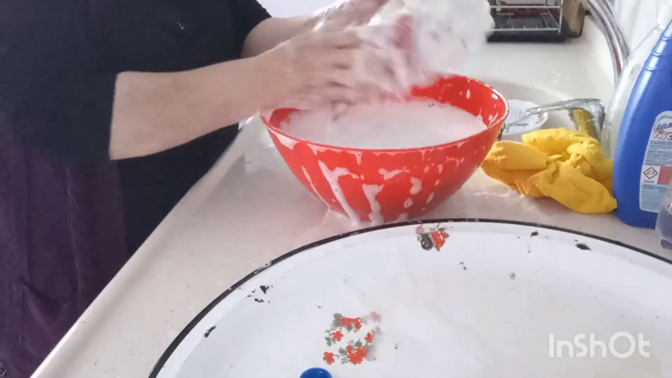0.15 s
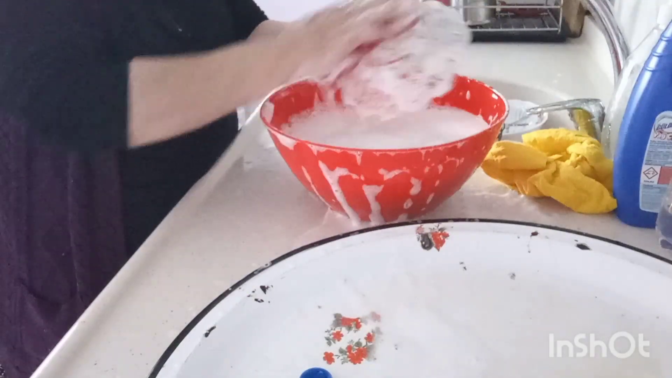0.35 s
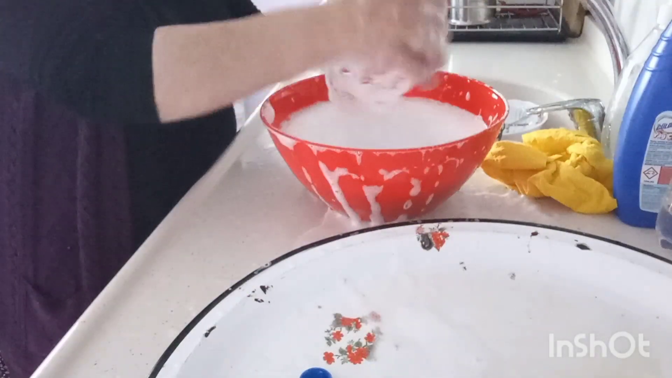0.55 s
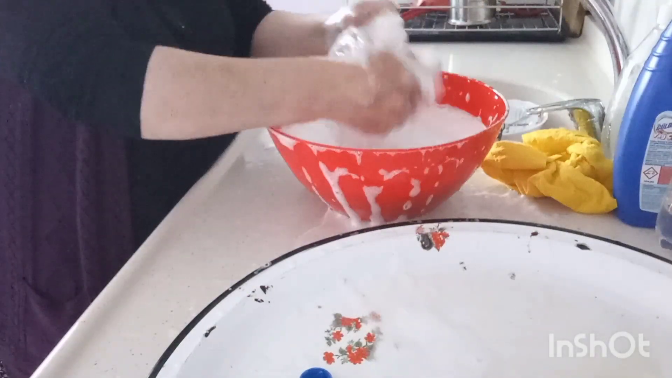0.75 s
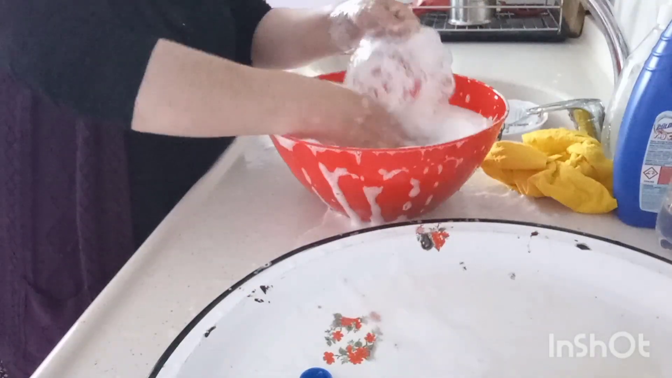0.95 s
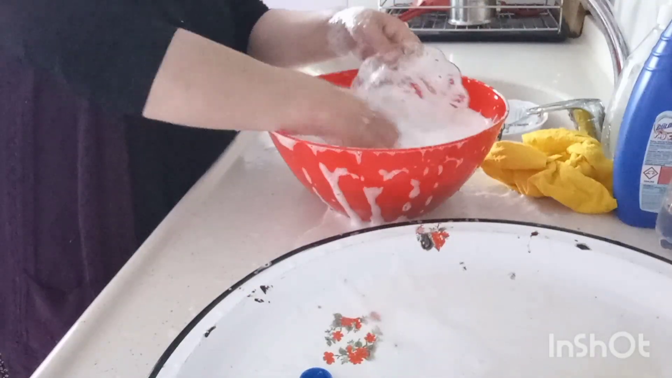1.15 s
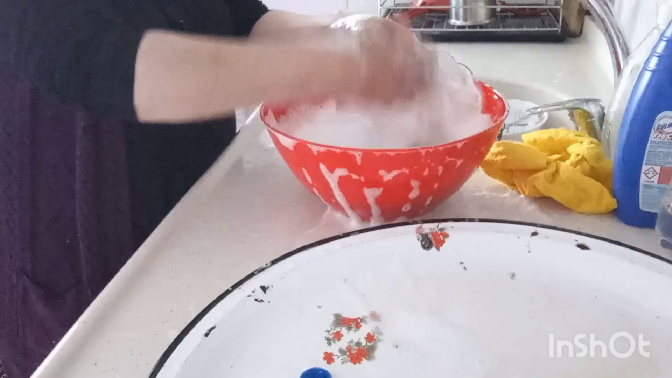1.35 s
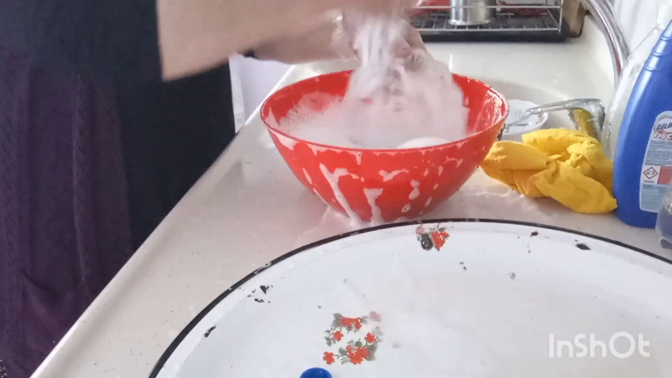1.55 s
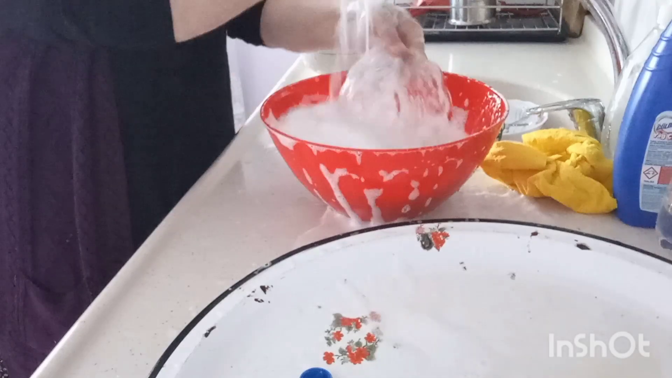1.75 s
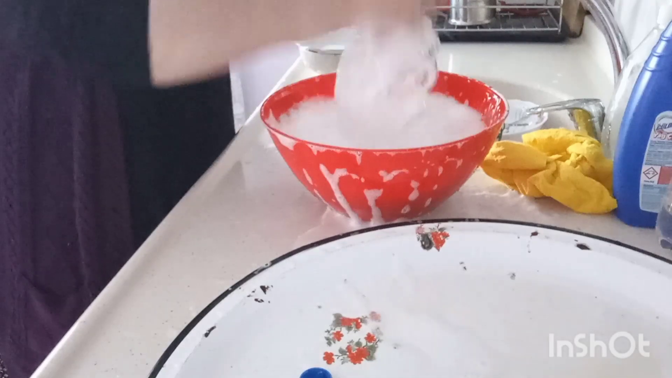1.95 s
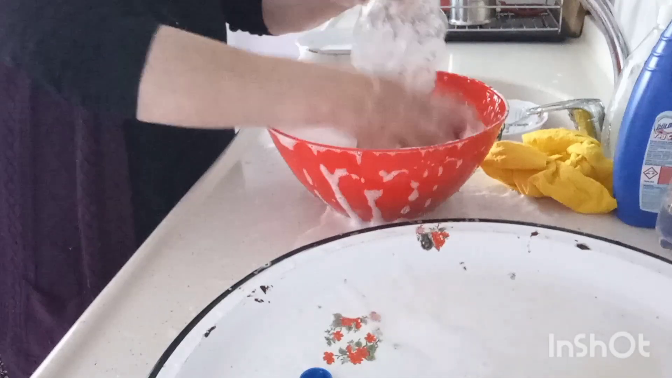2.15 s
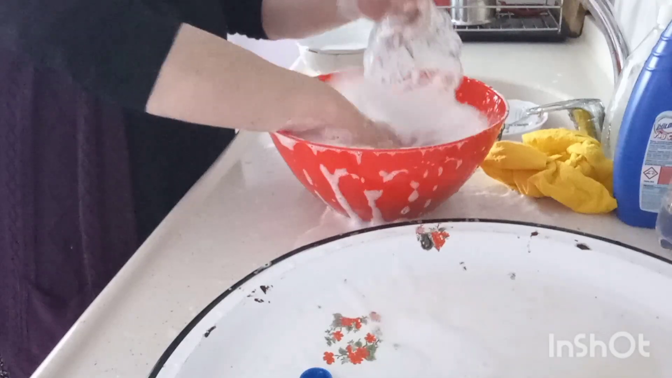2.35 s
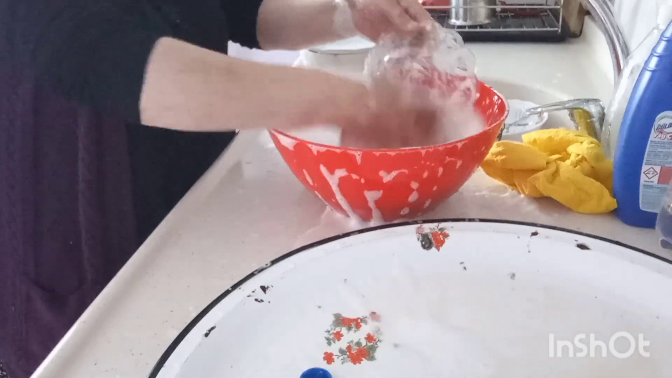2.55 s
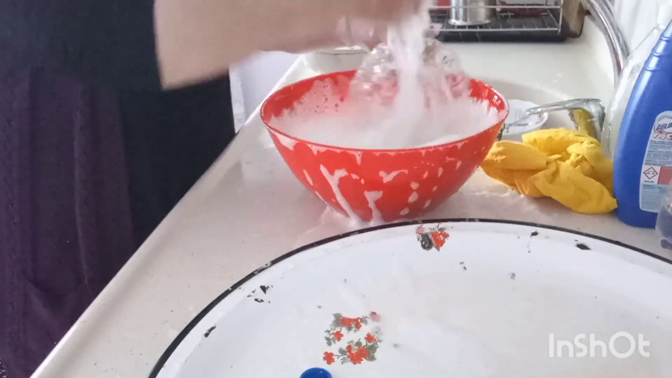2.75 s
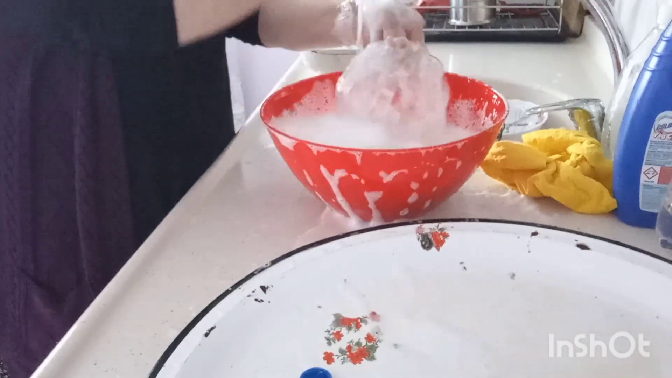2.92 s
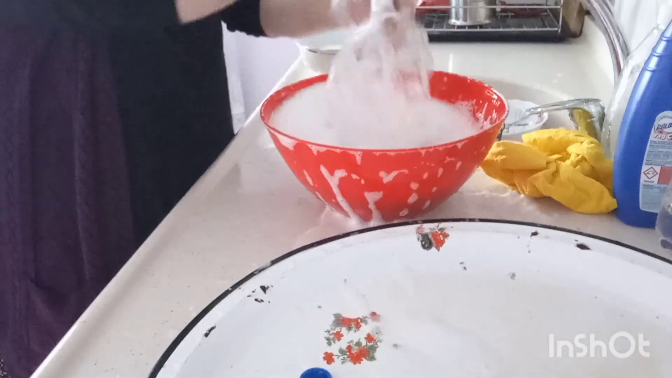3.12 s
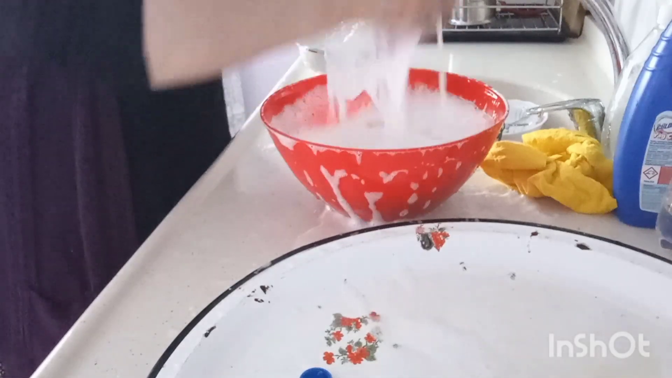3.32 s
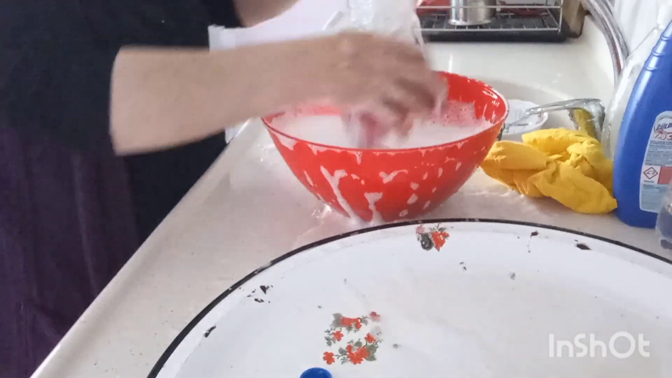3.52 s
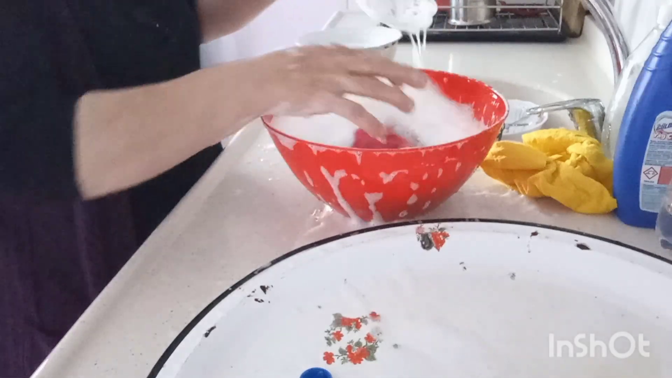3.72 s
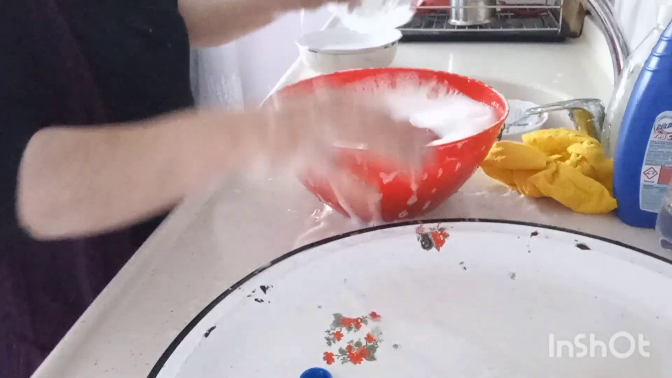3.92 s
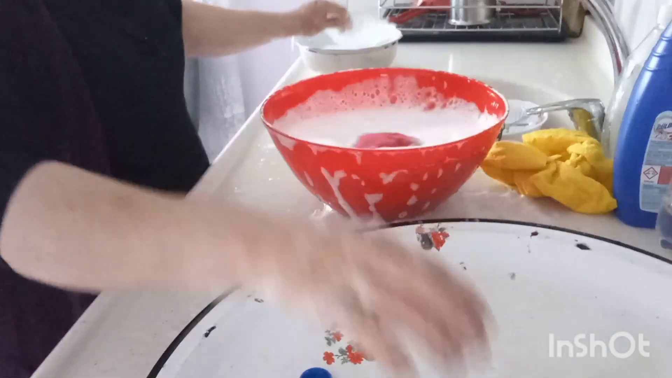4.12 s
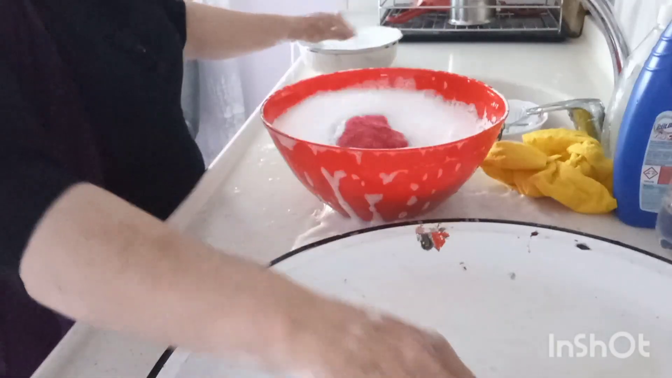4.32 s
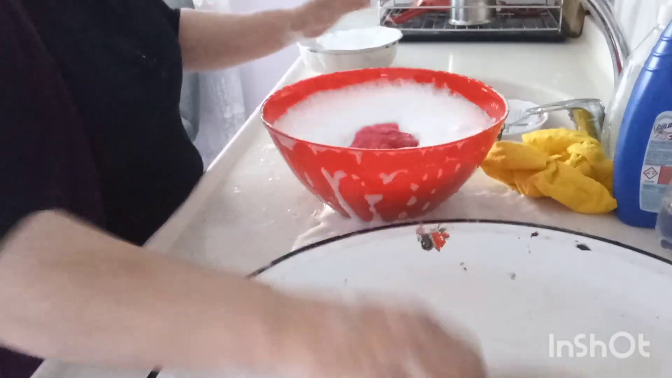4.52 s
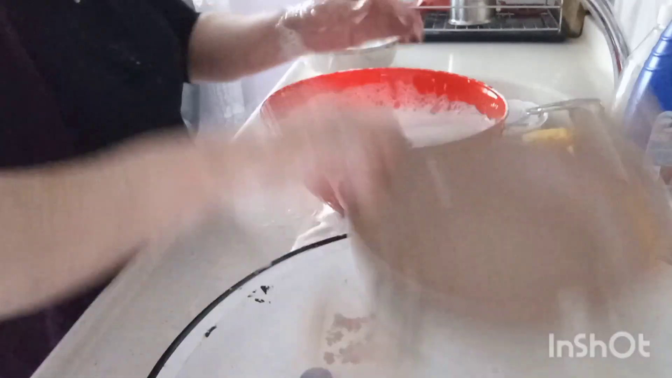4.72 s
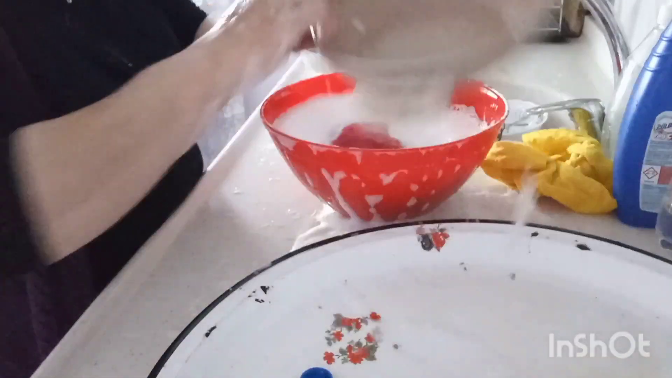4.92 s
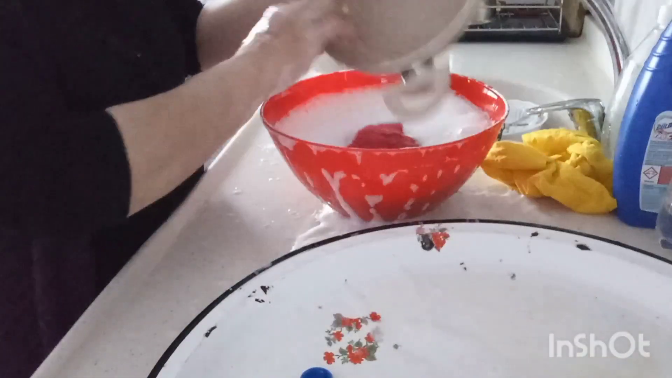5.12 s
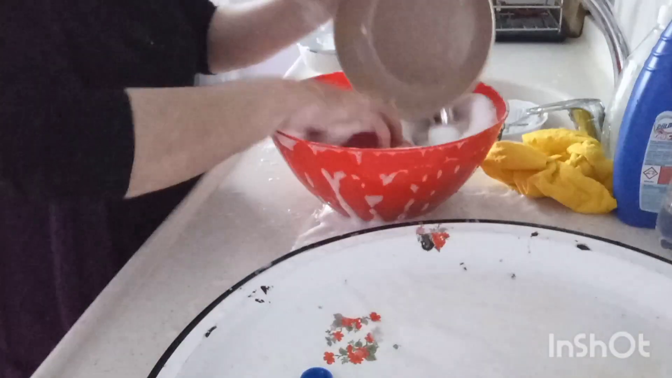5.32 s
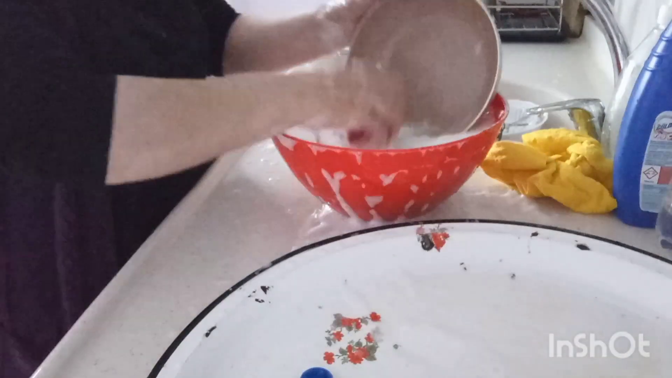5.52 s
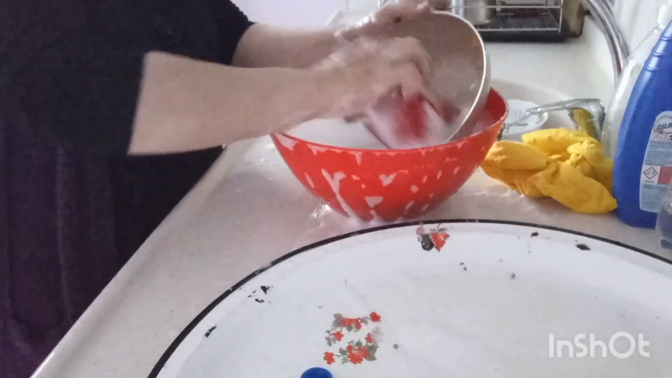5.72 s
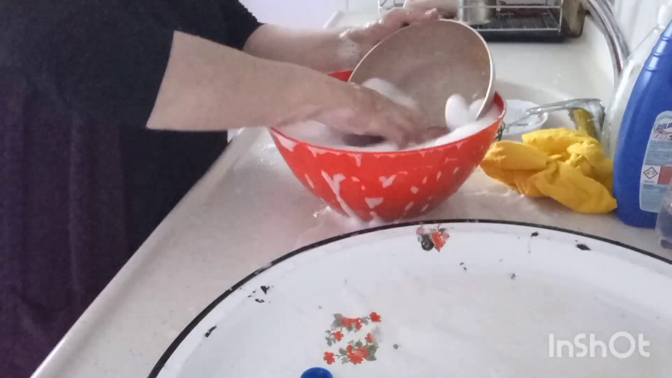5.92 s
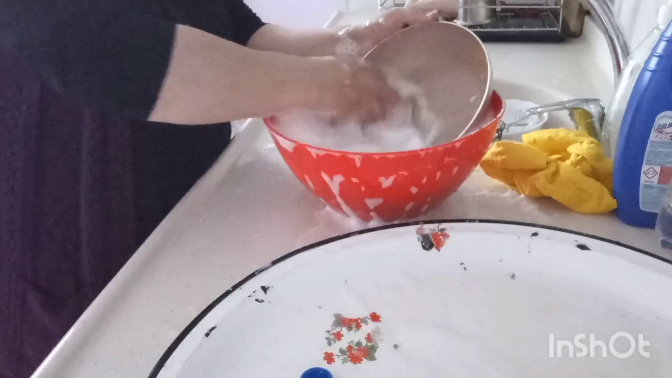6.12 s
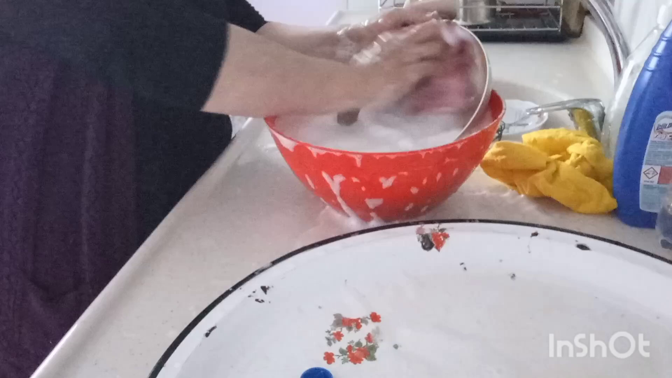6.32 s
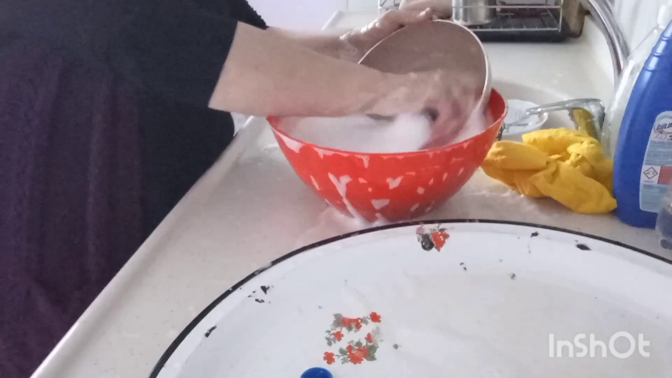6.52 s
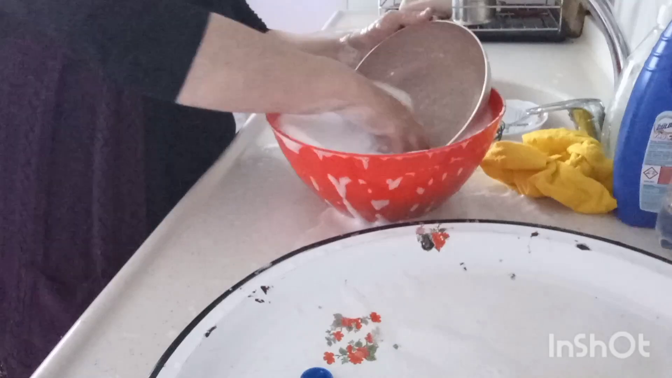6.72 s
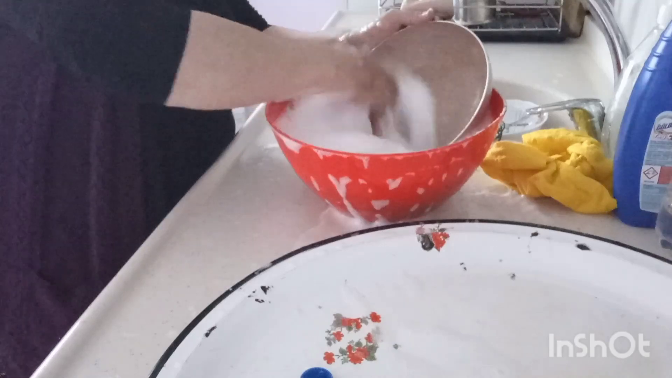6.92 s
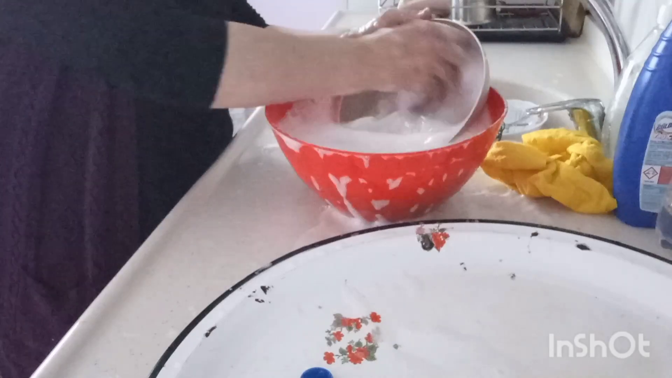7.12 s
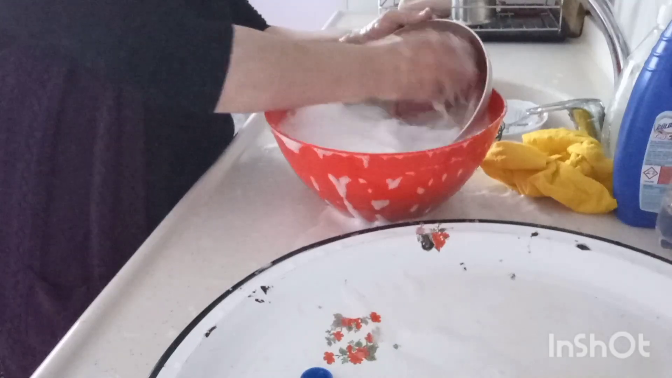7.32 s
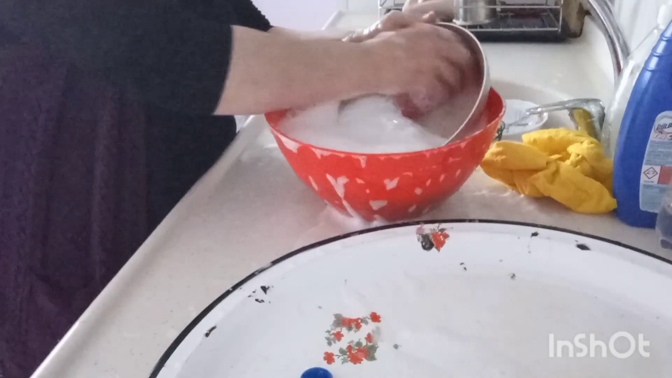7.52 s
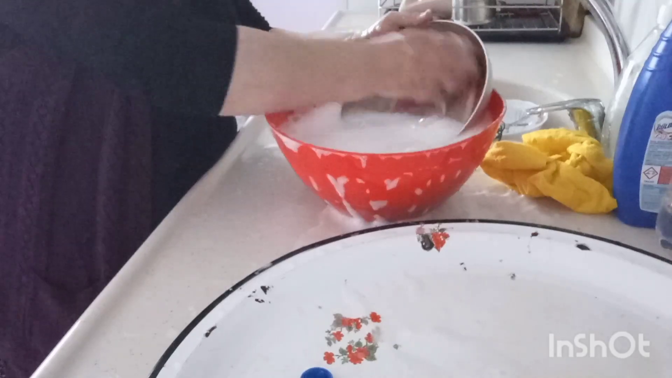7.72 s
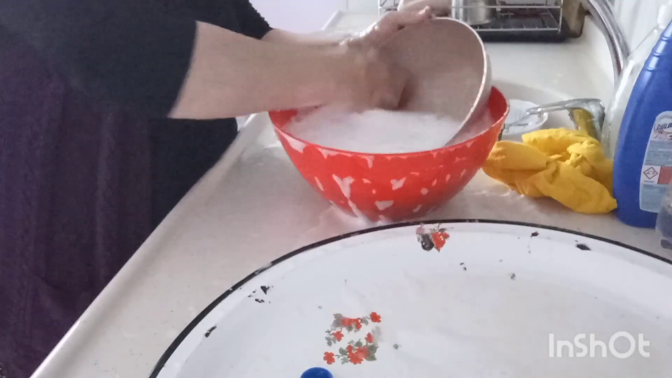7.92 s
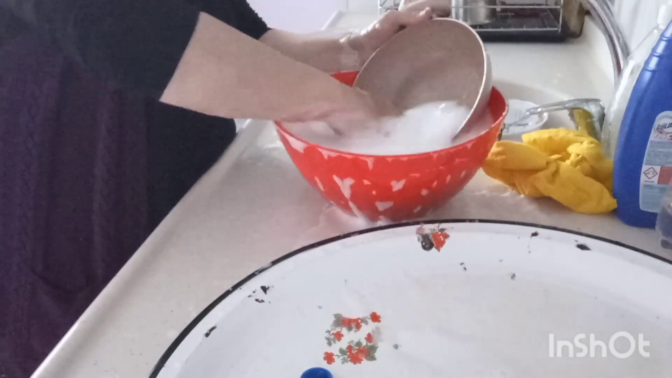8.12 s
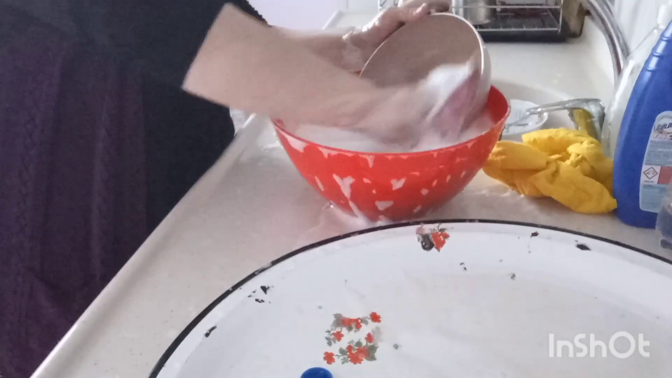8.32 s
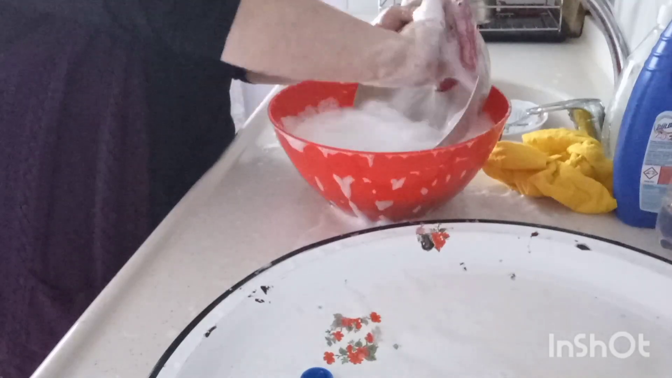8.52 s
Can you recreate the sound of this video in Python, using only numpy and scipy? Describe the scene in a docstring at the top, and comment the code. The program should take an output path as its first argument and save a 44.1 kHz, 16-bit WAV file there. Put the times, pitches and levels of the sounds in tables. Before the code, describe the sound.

Quiet sloshing, squelching and dripping of soapy water, then loud ringing pan clatter, a hollow watery thump, and gentle hollow scrubbing in a kitchen.

```python
"""Washing up by hand

A glass is sponged, dipped and drained in a plastic bowl of suds on a kitchen counter; then a pan
clatters on an enamel basin, bumps down into the bowl and is scrubbed. Water and foam are clouds
of damped sines, dishes are decaying modes, slaps and ticks are shaped noise, and scrubbing is
random impulses through the pan's resonances. A small hard room answers."""
import sys
import numpy as np
from scipy import signal
from scipy.fft import rfft, irfft, next_fast_len
from scipy.io import wavfile
from scipy.ndimage import uniform_filter1d

SR = 44100
rng = np.random.default_rng(int(sys.argv[2]) if len(sys.argv) > 2 else 0)


def file_out(sig):
    """Save sig as 16-bit WAV at sys.argv[1]."""
    # one column per channel
    cols = np.atleast_2d(sig).T
    # limit, then scale
    lim = np.clip(cols, -1, 1)
    pcm = np.round(lim * 32767).astype(np.int16)
    wavfile.write(sys.argv[1], SR, pcm)


N = 377496

# spectrum of water bubbles: (frequency [Hz], level [dB])
WATER = [(150, -33), (260, -20.5), (325, 8.5), (415, -3.5), (480, 6), (570, 2), (1000, 1.5), (1800, 5),
         (3000, 1), (7000, -21)]
# spectrum of bursting foam: (frequency [Hz], level [dB])
FOAM = [(500, 6.5), (1500, 1.5), (2500, -1.5), (4000, -1), (6300, 5.5), (7800, -16), (15000, 2)]
AIR_ATTACK_S = 0.0016  # onset of a single air pocket


def amp(db):
    """dB to amplitude."""
    return 10 ** (np.asarray(db) / 20)


def unit(x):
    """x at rms 1."""
    return x / np.sqrt(np.mean(x ** 2) + 1e-20)


def peak(x):
    """x at peak 1."""
    return x / (np.abs(x).max() + 1e-20)


def along(points, hz):
    """Interpolate (Hz, value) points on a log frequency axis."""
    f, v = np.transpose(points)
    return np.interp(np.log(hz + 1), np.log(f + 1), v)


def ring_time():
    """Half a second of time [s] for one event."""
    return np.arange(SR // 2) / SR


def splash_time():
    """A fifth of a second of time [s] for one splash."""
    return np.arange(SR // 5) / SR


def fade(t, t60):
    """Exponential decay, 60 dB in t60 seconds."""
    return amp(-60 * t / np.maximum(t60, 1e-3))


def burst(t, t60, attack):
    """A soft start, then an exponential decay."""
    return fade(t, t60) * (1 - np.exp(-t / attack))


def stroke(rise, t60):
    """The envelope of one hand movement: it swells for rise seconds, then dies away."""
    t = np.arange(int((rise + t60 * 2 / 3) * SR) + 1024) / SR
    swell = np.sin(np.pi / 2 * np.minimum(t / max(rise, 1e-3), 1))
    return swell * fade(np.maximum(t - rise, 0), t60)


def add(out, s, x):
    """Mix x into out at time s."""
    part = out[max(round(s * SR), 0):][:len(x)]
    part += x[:len(part)]


def filtered(x, gain):
    """x times a gain that depends on frequency."""
    m = next_fast_len(len(x) + 4096)
    return irfft(rfft(x, m) * gain(np.fft.rfftfreq(m, 1 / SR)), m)[:len(x)]


def coloured(x, points):
    """x through a (Hz, dB) spectrum, at rms 1."""
    return unit(filtered(x, lambda hz: amp(along(points, hz))))


def noise(points, size):
    """White noise through a (Hz, dB) spectrum, at rms 1."""
    return coloured(rng.standard_normal(size), points)


def dying(t60s):
    """Half a second of noise in which each frequency dies at its own speed."""
    hz, t, z = signal.stft(rng.standard_normal(SR // 2), SR, nperseg=256)
    return signal.istft(z * fade(t, along(t60s, hz)[:, None]), SR, nperseg=256)[1][:SR // 2]


def ring(modes, scatter_db, wander):
    """One blow on a set of decaying modes, each at a new strength and with a wandering phase."""
    t = ring_time()
    knots = np.linspace(0, t[-1], num=50)
    out = np.zeros(len(t))
    for hz, db, t60 in modes:
        phase = np.interp(t, knots, np.cumsum(wander * rng.standard_normal(len(knots))))
        tone = np.sin(2 * np.pi * hz * t + phase - phase[0])
        out += amp(db + scatter_db * rng.normal()) * fade(t, t60) * tone
    return out


def bubbles(pitch, rate, spread, cycles, size_db, rise):
    """A cloud of damped sines, gliding up by the share rise, scattered round a pitch curve; rms 1."""
    size = len(pitch)
    u = rng.random((int(rate * size / SR) + 1, 4))
    start = (u[:, 0] * size).astype(int)
    scatter = np.exp(spread * (u[:, 1] + u[:, 2] - 1))
    hz = np.clip(pitch[start] * scatter, 150, 15000)[:, None]
    loud = amp(size_db * np.minimum(-np.log(u[:, 3]), 3.5))[:, None]
    k = np.arange(int(min(SR * cycles / np.percentile(hz, 10), 1500)))
    age = hz * k / SR / cycles
    turns = cycles * age * (1 + rise * np.minimum(age, 1) / 2)
    wave = loud * fade(age, 0.54) * (1 - np.exp(-20 * age)) * np.sin(2 * np.pi * turns)
    return unit(np.bincount((start[:, None] + k).ravel(), wave.ravel(), size)[:size])


def cavities(x, depth_db):
    """Shifting hollows between hand, dish and water favour some pitches for a moment."""
    z = signal.stft(x, nperseg=512, noverlap=384)[2]
    field = uniform_filter1d(rng.standard_normal(z.shape), size=4, axis=0)  # over frequency
    field = uniform_filter1d(field, size=24, axis=1)  # over time
    z = z * amp(depth_db * np.tanh(unit(field)))
    return unit(signal.istft(z, nperseg=512, noverlap=384)[1][:len(x)])


def background():
    """Still air as shaped noise, with a faint appliance hum and whine as steady sines."""
    # still room: (frequency [Hz], level [dB])
    room_floor = [(15, -58), (25, -23), (69, -12), (101, -7.5), (260, -23), (331, -21), (1020, -29),
                  (1340, -33), (1570, -31), (2120, -34), (5730, -35), (8810, -47), (15500, -38)]
    # appliance hum and whine: (frequency [Hz], rms level [dB])
    hum_lines = [(96.9, -82.5), (333.8, -83.5), (10153, -92)]
    t = np.arange(N) / SR
    hum = sum(amp(db) * np.sqrt(2) * np.sin(2 * np.pi * hz * t) for hz, db in hum_lines)
    return amp(-70.5) * noise(room_floor, size=N) + hum


def kitchen(x, early_db, wet_db):
    """Counter and near walls answer first, then the room; both are redrawn every third of a second."""
    # room decay: (frequency [Hz], t60 [s])
    room_t60 = [(100, 0.42), (300, 0.33), (1000, 0.41), (5000, 0.27), (14000, 0.1)]
    out, hop = np.zeros(N), SR // 3
    for start in range(0, N, hop):
        tail = dying(room_t60)
        delays_s = rng.uniform(0, .012, size=9)
        early = np.bincount((delays_s * SR).astype(int), rng.choice([-1, 1], size=9), len(tail))
        answer = amp(early_db) * early / np.linalg.norm(early)
        answer = answer + amp(wet_db) * tail / np.linalg.norm(tail)
        add(out, start / SR + 0.001512, signal.fftconvolve(x[start:start + hop], answer))
    return x + out


def in_pan(x):
    """Once the pan stands in the bowl, its hollow colours the washing inside it."""
    # pan hollow: (frequency [Hz], gain [dB])
    hollow_gain = [(330, 1.5), (400, -5), (490, 4.5), (720, 1.5), (870, 0), (1080, 2), (2100, -2.5),
                   (2500, -7), (3000, -9.5), (3300, -1.5), (3800, -3), (5100, 3), (5450, -2), (7000, 3)]
    pan_in_s = 5.6
    inside = np.clip((np.arange(N) / SR - pan_in_s) * 10, 0, 1)
    return (1 - inside) * x + inside * filtered(x, lambda hz: amp(along(hollow_gain, hz)))


def bowl():
    """The water-laden plastic bowl rocks on the counter (low modes) and clacks when hit (noise)."""
    # rocking: (time [s], level [dB], lower mode [Hz])
    thumps = [(0.333, -42.5, 138.5), (0.388, -42, 135.5), (1.206, -40, 119.5), (1.416, -43, 136),
              (1.791, -52.5, 126.5), (2.464, -38, 135), (2.604, -50.5, 143), (5.149, -50, 129),
              (5.446, -42.5, 152), (5.628, -22, 156.3), (5.675, -35, 156.9), (6.856, -48, 195),
              (7.268, -48, 79.7), (7.682, -59, 202), (8, -47, 158)]
    # bumps: (time [s], body level [dB], clack level [dB], gain of the modes below 250 Hz [dB])
    knocks = [(3.684, -30.5, -31, -9.5), (5.467, -28.5, -34.5, 3.5), (5.497, -12, -21.5, -2.5),
              (5.517, -18.5, -46, 5.5), (5.558, -22, -41, 3.5), (5.575, -23.5, -25.5, 15),
              (5.583, -17.5, -46, -3.5), (5.621, -28, -46, 21), (5.872, -37.5, -31, -2),
              (5.947, -37.5, -35, 19), (6.001, -34, -40, 0)]
    # full bowl: (mode [Hz], level [dB], t60 [s])
    bowl_modes = [(90, -18.5, 0.26), (141.1, -5, 0.2), (165.2, -11, 0.27), (196, -2, 0.15),
                  (321.7, 0.5, 0.13), (343.7, -3, 0.099), (482, -5, 0.122), (780, -17.5, 0.17),
                  (942, -12, 0.094), (1050, -13, 0.099)]
    # plastic wall: (frequency [Hz], level [dB])
    clack_spectrum = [(200, -27), (500, 10.5), (1000, 0), (2500, -5.5), (4500, -15), (7000, -24.5),
                      (15000, -50.5)]
    out, t = np.zeros(N), ring_time()
    for s, db, hz in thumps:
        thump = ring([(hz, 0, .2), (hz * 1.4, -7, .12)], scatter_db=2.0, wander=0.36)
        add(out, s, amp(db) * peak(thump * burst(t, 0.9, attack=0.013)))
    for s, body_db, clack_db, depth_db in knocks:
        # each bump has its own gain on the modes below 250 Hz
        modes = [(hz, level + depth_db * (hz < 250), t60) for hz, level, t60 in bowl_modes]
        body = peak(ring(modes, scatter_db=0.5, wander=0.58) * (1 - np.exp(-t / 0.0015)))
        clack = noise(clack_spectrum, size=len(t)) * burst(t, 0.041, attack=0.00085)
        add(out, s, amp(body_db) * body + amp(clack_db) * clack)
    return out


def basin_tone(x, boom_db, edge_db, spacing_hz):
    """Each contact has its own bass and treble gain; the contact point favours a comb of modes."""
    strike_point_db = 2
    tilt = [(350, boom_db), (700, 0), (2600, 0), (5000, edge_db)]
    comb = lambda hz: strike_point_db * np.cos(2 * np.pi * hz / spacing_hz)
    return filtered(x, lambda hz: amp(along(tilt, hz) + comb(hz)))


def basin():
    """The pan strikes the enamel basin (noise and modes) and chatters on it (random contacts)."""
    # blows: (time [s], level [dB], boom [dB], edge [dB], spacing of favoured modes [Hz])
    clatter = [(4.1986, -13, 1.5, 3.5, 2660), (4.2033, -14.5, 5, 3, 2470), (4.2096, -11.5, 6.5, 2, 3000),
               (4.291, -7, 0, -4, 2850), (4.2974, -14.5, 2, -4.5, 2720), (4.4029, -12.5, 0, 4.5, 2170),
               (4.4077, -11.5, -4.5, 5.5, 2380), (4.4232, -23, 0, 6, 2120), (4.4759, -17, 2, -7.5, 2020),
               (4.4858, -12, -3, 3, 2050), (4.4915, -14, 0.5, 0.5, 1950), (4.5301, -22.5, 7, 5.5, 2100),
               (4.563, -17, 2.5, -4.5, 2150), (4.596, -23, 3, -9, 1980)]
    # scraping: (start [s], end [s], level [dB], boom [dB], edge [dB], spacing of favoured modes [Hz])
    chatter = [(4.219, 4.28, -32, 3, -7, 2800), (4.304, 4.37, -33.5, 5.5, -5.5, 2750),
               (4.412, 4.498, -35, -4, 5, 2150), (4.496, 4.614, -30.5, -4.5, -5.5, 2100),
               (4.609, 4.677, -39, 0.5, -8, 2150)]
    # enamel basin: (mode [Hz], level [dB], t60 [s])
    basin_modes = [(142, 1, .36), (161, -3, .28), (203, -2, .25), (251, 0, .28), (305, 0, .28),
                   (410, -4, .22), (482, -2, .25), (557, 1, .34), (689, -2, .36), (845, -4, .3),
                   (1130, -1, .32), (1396, -2, .28), (1463, -2, .28), (1560, -3, .3), (1730, -3, .25),
                   (1844, -1, .3), (1914, 0, .3), (2431, 0, .3), (2541, 0, .28), (2658, 1, .32),
                   (2790, -3, .22), (3310, -6, .22), (4005, -10, .2), (4295, -5, .33), (4760, -8, .28),
                   (5280, -5, .26), (5638, -1, .28), (5880, -7, .3), (6270, -6, .26), (6520, -8, .18),
                   (6990, -7, .26), (8950, -13, .2), (9580, -14, .16), (10600, -16, .16)]
    # crowd of weaker modes: (frequency [Hz], level [dB])
    wash_spectrum = [(41, -51), (70, -38), (125, -6.5), (222, -7), (311, 3), (511, -6), (670, 2.5),
                     (785, -5.5), (1130, -0.5), (1850, -1.5), (2220, -5.5), (2600, -2.5), (3490, -10.5),
                     (4700, -8), (4970, -16), (5250, -6), (6400, -8), (7100, -10.5), (8500, -23),
                     (15500, -23.5)]
    # decay of the weaker modes: (frequency [Hz], t60 [s])
    wash_t60 = [(200, 0.45), (2500, 0.36), (7000, 0.35), (12000, 0.28)]
    wash_spacing_hz, wash_ripple_db = 55, 4
    rattles_per_s, rattle_scatter_db = 260, 4
    out, t = np.zeros(N), ring_time()

    # the weaker modes lie at random, but every contact rings the same ones
    grid = np.arange(0, SR / 2, wash_spacing_hz)
    ripple = np.tanh(rng.standard_normal(len(grid)))
    ripple_db = lambda hz: wash_ripple_db * np.interp(hz, grid, ripple) * (hz > 800)
    wash = lambda x: filtered(x, lambda hz: amp(along(wash_spectrum, hz) + ripple_db(hz)))

    for s, db, boom_db, edge_db, spacing_hz in clatter:
        crack = unit(wash(rng.standard_normal(len(t)))) * fade(t, 0.033)
        crash = amp(3.0) * crack + amp(-18.0) * unit(wash(dying(wash_t60)))
        ringing = ring(basin_modes, scatter_db=1.0, wander=0.65) * (1 - np.exp(-t / 0.00067))
        blow = crash + amp(-18.5) * ringing
        add(out, s, amp(db) * basin_tone(peak(blow), boom_db, edge_db, spacing_hz))

    upper_modes = [mode for mode in basin_modes if mode[0] > 500]
    for start, end, db, boom_db, edge_db, spacing_hz in chatter:
        size = max(int((end - start) * SR), 2)
        signs = rng.choice([-1, 1], size)
        force = amp(rattle_scatter_db * np.clip(rng.standard_normal(size), -2, 1.5))
        contacts = signs * force * (rng.random(size) < rattles_per_s / SR)
        # every contact rasps; they are too light to ring any but the upper modes
        pressure = signal.fftconvolve(contacts ** 2, fade(t, 0.02))
        rasp = unit(np.sqrt(np.abs(pressure)) * wash(rng.standard_normal(len(pressure))))
        light_ring = ring(upper_modes, scatter_db=4.5, wander=1.0) * fade(t, 0.15)
        ringing = unit(signal.fftconvolve(contacts, light_ring))
        scrape = basin_tone(rasp + amp(-3.5) * ringing, boom_db, edge_db, spacing_hz)
        # the level refers to the contact span, without its tail
        add(out, start, amp(db) * np.sqrt(size / len(rasp)) * scrape)
    return out


def taps(rows, modes):
    """A hard noise tick, followed by the modal ring and noise shimmer of the hand-held vessel."""
    # hard contact: (frequency [Hz], level [dB])
    tick_spectrum = [(300, -12.5), (700, -2.5), (2500, -14.5), (4500, -9.5), (6500, -13), (8500, -20),
                     (15000, -12)]
    shimmer_spectrum = [(450, -28.5), (700, 1.0), (2800, 1.0), (4500, -10.0), (7500, -23), (15000, -11.0)]
    out, t = np.zeros(N), ring_time()
    for s, tick_db, ring_db, sparkle_db in rows:
        contact = [(hz, level + sparkle_db * (hz > 7500)) for hz, level in tick_spectrum]
        tick = peak(noise(contact, size=len(t)) * burst(t, 0.033, attack=0.00058))
        # a short noise shimmer, strongest at 700-2800 Hz, fills in between the modes
        shimmer = noise(shimmer_spectrum, size=len(t)) * burst(t, 0.14, attack=0.0008)
        tone = peak(ring(modes, scatter_db=4.0, wander=0.36) * (1 - np.exp(-t / 0.0016)))
        tone = tone + amp(-1.5) * peak(shimmer)
        add(out, s, amp(tick_db) * tick + amp(ring_db) * tone)
    return out


def glass_taps():
    """The wet, hand-held glass is tapped and rings briefly."""
    # taps: (time [s], tick level [dB], ring level [dB], tick gain above 7.5 kHz [dB])
    tap_rows = [(1.1942, -28, -35.5, 2), (2.3845, -38.5, -63, -28)]
    # wet glass: (mode [Hz], level [dB], t60 [s])
    glass_modes = [(1550, -5, 0.25), (3400, -2, 0.1), (3940, -5, .12), (5150, 5, 0.037), (5800, -7, 0.089),
                   (7140, 11, 0.028), (9640, -1, 0.07), (10800, -11, .09)]
    return taps(tap_rows, glass_modes)


def pan_taps():
    """The rim of the hand-held pan is tapped and rings."""
    # taps: (time [s], tick level [dB], ring level [dB], tick gain above 7.5 kHz [dB])
    tap_rows = [(5.057, -59, -51, -6), (5.0754, -35, -31, 1), (5.417, -44, -62, -1),
                (5.4231, -26.5, -42.5, -4.5), (5.4969, -35, -49, -20), (5.5762, -55.5, -59, 6),
                (5.5824, -36, -50, 31), (5.8711, -36.5, -50, -14), (5.9439, -42.5, -43, 2)]
    # hand-held pan: (mode [Hz], level [dB], t60 [s])
    pan_modes = [(545, -3, .35), (635, -8, .38), (738, -1, .33), (850, 0, .11), (925, 2, .09),
                 (969, -5, .42), (1060, -4, .1), (1437, -7, .38), (1878, -2, .32), (1970, 1, .1),
                 (2210, -1, .1), (2340, -3, .15), (2430, -2, .09), (2665, -2, .15), (2853, -4, .13),
                 (3070, -4, .14), (3420, -14, .2), (3704, -15, .2), (4150, -9, .11), (4484, -15, .13),
                 (5020, -14, .11), (5630, -14, .11)]
    return taps(tap_rows, pan_modes)


def finger_ticks():
    """Wet fingers tick against the pan, damped at once by the grip: two short noise bursts each."""
    # ticks: (time [s], level [dB], knock pitch [Hz], snap level re knock [dB])
    tick_rows = [(6.503, -64, 1200, 11), (6.733, -49.5, 850, -14), (6.958, -39.5, 1610, -12),
                 (7.013, -47.5, 1280, 1), (7.065, -40.5, 980, -3.5), (7.223, -45, 1090, -19),
                 (7.353, -44, 940, -19), (7.684, -48, 1000, 1), (8.321, -40, 1470, -16)]
    snap_spectrum = [(1000, -2), (2200, 7), (5200, -2), (7500, -19), (15000, -17)]
    out, t = np.zeros(N), ring_time()
    for s, db, hz, snap_db in tick_rows:
        knock_spectrum = [(hz / 4, -22), (hz * 0.4, -3), (hz, 0), (hz * 1.67, -5), (hz * 3, -24), (hz * 8, -50)]
        knock = noise(knock_spectrum, size=len(t)) * burst(t, 0.13, attack=0.00045)
        snap = noise(snap_spectrum, size=len(t)) * burst(t, 0.047, attack=0.00044)
        add(out, s, amp(db) * (peak(knock) + amp(snap_db) * peak(snap)))
    return out


def gulps():
    """The pocket of air under the glass changes size, so its resonance glides."""
    # gulps: (time [s], glide length [s], level [dB], first pitch [Hz], last pitch [Hz])
    gulp_rows = [(0.378, 0.047, -49, 1342, 1262), (1.365, 0.0178, -41, 1463, 900),
                 (1.469, .018, -51, 1055, 930), (2.051, 0.02, -46, 990, 778),
                 (2.578, .03, -52.5, 772, 1018), (2.608, 0.05, -58, 1220, 1630),
                 (2.659, .012, -48.5, 1860, 2300), (2.68, .025, -66, 2000, 2300)]
    churn_db = -3.5  # small bubbles round the pocket
    out, t = np.zeros(N), splash_time()
    for s, length, db, first_hz, last_hz in gulp_rows:
        pitch = first_hz * (last_hz / first_hz) ** np.minimum(t / length, 1)
        pocket = np.sin(2 * np.pi * np.cumsum(pitch) / SR) * (1 - np.exp(-t / AIR_ATTACK_S))
        churn = bubbles(pitch, rate=2300, spread=0.18, cycles=14, size_db=1.0, rise=0)
        add(out, s, amp(db) * (pocket + amp(churn_db) * churn) * fade(np.maximum(t - length, 0), 0.022))
    return out


def sloshing():
    """Each sweep of the hand stirs up big bubbles; each push shakes the bowl as low noise."""
    # hand through water: (start [s], rise [s], t60 [s], level [dB], bubble pitch [Hz])
    sweeps = [(0.02, 0.12, 0.24, -61.5, 870), (0.1, 0.24, 0.59, -56.5, 697), (0.31, 0.052, 0.4, -51, 384),
              (0.47, 0.037, 0.32, -56, 450), (0.616, 0.094, 0.32, -64, 306),
              (0.881, 0.15, 0.52, -59.5, 840), (1.191, 0.027, 0.44, -48.5, 632),
              (1.289, 0.071, 0.12, -53, 980), (1.392, 0.012, 0.41, -44.5, 780),
              (1.6, 0.18, 0.69, -58.5, 593), (2.079, 0.047, 0.53, -58, 840), (2.21, 0.074, 0.15, -58, 1160),
              (2.382, 0.0052, 0.27, -52.5, 770), (2.44, 0.12, 0.44, -53.5, 674),
              (2.571, 0.013, 0.42, -58.5, 850), (2.7, 0.042, 0.61, -61, 300),
              (2.834, 0.084, 0.47, -51.5, 1110), (2.84, 0.1, 0.44, -54, 210),
              (3.329, 0.076, 0.2, -63.5, 535), (3.46, 0.036, 0.12, -54, 660), (5.5, 0.076, 0.38, -37, 710),
              (5.64, 0.034, 0.28, -44, 340), (5.858, 0.016, 0.35, -51, 514), (5.941, 0.015, 0.56, -45, 647),
              (6.23, 0.035, 0.65, -61.5, 906), (6.39, 0.047, 0.17, -61.5, 1730),
              (6.48, 0.033, 0.62, -62, 700), (6.781, 0.16, 0.52, -61, 656), (7.2, 0.039, 0.4, -57, 885),
              (7.352, 0.077, 0.24, -61, 580), (7.82, 0.03, 0.52, -56.5, 734), (7.949, 0.05, 0.38, -63, 341),
              (8.27, 0.19, 0.56, -69, 560)]
    # hands against the bowl: (start [s], rise [s], t60 [s], level [dB])
    pushes = [(0.03, 0.04, 2.2, -58), (0.3, 0.053, 0.34, -42.5), (0.551, 0.56, 1.1, -61.5),
              (1.191, 0.04, 0.22, -45), (1.398, 0.033, 0.63, -54), (2.399, 0.091, 0.57, -51.5),
              (5.66, 0.048, 1.6, -47.5), (6.091, 0.051, 0.24, -51), (6.32, 0.038, 5.6, -61),
              (6.812, 0.019, 0.77, -59), (7.217, 0.03, 0.91, -54), (7.818, 0.093, 0.47, -55),
              (8.25, 0.0318, 2.6, -70)]
    # shuddering bowl: (frequency [Hz], level [dB])
    rumble = [(30, 3.5), (60, -10), (90, -1), (130, 3.5), (200, -3.5), (270, -16.5), (500, -75)]
    out = np.zeros(N)
    for s, rise, t60, db, hz in sweeps:
        effort = stroke(rise, t60)
        pitch = np.full(len(effort), hz)
        cloud = bubbles(pitch, rate=260, spread=1.32, cycles=18, size_db=3.5, rise=0.057)
        add(out, s, amp(db) * effort * cavities(coloured(cloud, WATER), depth_db=-0.5))
    for s, rise, t60, db in pushes:
        effort = stroke(rise, t60)
        add(out, s, amp(db) * effort * noise(rumble, size=len(effort)))
    return out


def squeezed_foam():
    """The pressed sponge's foam bursts into fine bubbles, spray and a few pops of larger cells."""
    # presses: (start [s], rise [s], t60 [s], foam level [dB], spray level [dB], foam pitch [Hz])
    squeezes = [(0.0, 0.016, 1.9, -63, -89, 4400), (0.14, 0.12, 1.11, -54.5, -62.5, 4320),
                (0.38, 0.084, 1.06, -54.5, -65.5, 3700), (0.839, 0.067, 0.72, -64.5, -74, 4200),
                (0.981, 0.051, 0.36, -64, -91, 2800), (1.189, 0.0058, 0.17, -52.5, -72, 5000),
                (1.438, 0.025, 0.31, -54.5, -89, 3700), (1.738, 0.022, 0.44, -59.5, -80, 4060),
                (1.969, 0.024, 0.2, -53.5, -70, 3100), (2.07, 0.12, 0.33, -56, -64, 3600),
                (2.382, 0.0026, 0.19, -49.5, -88, 2750), (2.44, 0.021, 0.2, -51.5, -69, 2480),
                (2.573, 0.05, 0.93, -53, -70, 3270), (3.12, 0.047, 0.34, -57, -67, 4740),
                (3.32, 0.084, 0.28, -57, -67, 3260), (3.458, 0.019, 0.29, -58, -68.5, 2710),
                (5.788, 0.028, 0.52, -59, -93, 2560), (5.861, 0.013, 0.16, -47, -73, 2800),
                (6.099, 0.066, 0.78, -67, -73.5, 2350), (6.381, .05, 1.2, -67.5, -79, 3170),
                (6.597, 0.033, 2.1, -77, -81, 4290), (6.848, 0.18, 0.84, -65.5, -77.5, 2540),
                (7.159, 0.091, 0.27, -68, -97, 4430), (7.37, 0.075, 0.18, -66, -73, 3740),
                (7.57, 0.079, 0.29, -65.5, -78, 4450), (7.77, 0.063, 0.47, -60, -57.5, 6900),
                (7.901, 0.11, 0.45, -62.5, -68.5, 3470), (8.128, 0.051, 0.36, -69.5, -73.5, 4660),
                (8.379, 0.14, 0.41, -76.5, -74, 2980)]
    # fine spray: (frequency [Hz], level [dB])
    spray_spectrum = [(3000, 2), (7000, 4.5), (9000, -5.5), (12500, 2), (15500, -2)]
    pops_per_s, pop_re_foam_db = 80, -9
    out = np.zeros(N)
    for s, rise, t60, foam_db, spray_db, hz in squeezes:
        effort = stroke(rise, t60)
        pitch = np.full(len(effort), hz)
        foam = bubbles(pitch, rate=1500, spread=0.88, cycles=12.3, size_db=2.5, rise=0.056)
        foam = cavities(coloured(foam, FOAM), depth_db=6.0)
        spray = bubbles(2 * pitch, rate=1500, spread=0.33, cycles=1.5, size_db=1.5, rise=0)
        spray = coloured(spray, spray_spectrum)
        pops = bubbles(pitch, rate=pops_per_s, spread=0.71, cycles=22, size_db=7, rise=0.044)
        crackle = amp(foam_db) * (foam + amp(pop_re_foam_db) * pops)
        add(out, s, effort * (crackle + amp(spray_db) * spray))
    return out


def draining():
    """Suds run out of the lifted glass; the thinning stream makes ever smaller, higher bubbles."""
    # drains: (start [s], rise [s], t60 [s], level [dB], first bubble pitch [Hz])
    drains = [(1.531, 0.14, 0.34, -52.5, 3240), (2.579, 0.09, 0.24, -73, 1390),
              (2.83, 0.22, 0.41, -46, 2170)]
    # drone of the bowl under the stream: (frequency [Hz], level [dB])
    drone_spectrum = [(150, -31), (270, -18.5), (330, 6.5), (400, -30), (490, -8), (700, -21), (2000, -56)]
    octaves_per_s, top_hz, drone_db = 5.03, 5020, -18
    out = np.zeros(N)
    for s, rise, t60, db, hz in drains:
        flow = stroke(rise, t60)
        pitch = np.minimum(hz * 2 ** (octaves_per_s * np.arange(len(flow)) / SR), top_hz)
        stream = bubbles(pitch, rate=1100, spread=0.63, cycles=10, size_db=3.0, rise=.05)
        stream = cavities(coloured(stream, FOAM), depth_db=0.5)
        drone = amp(drone_db) * noise(drone_spectrum, size=len(flow))
        add(out, s, amp(db) * flow * (stream + drone))
    return out


def squelches():
    """Wet slaps and squelches: bursts of bubbles over a noise slap."""
    # squelches: (time [s], level [dB], pitch [Hz], t60 [s])
    squelch_rows = [(0.176, -40.5, 1270, 0.042), (0.263, -42.5, 900, .06), (0.335, -40, 626, 0.051),
                    (0.401, -41, 1310, 0.062), (0.979, -51.5, 1100, 0.062), (1.009, -66, 1180, 0.079),
                    (1.044, -58, 880, 0.062), (1.392, -28.5, 740, 0.031), (1.471, -39, 610, 0.056),
                    (1.782, -45.5, 1190, 0.042), (1.97, -40, 855, 0.041), (2.102, -40.5, 535, 0.12),
                    (2.447, -35, 726, 0.062), (2.611, -40, 1390, 0.043), (2.839, -40, 1110, 0.079),
                    (2.869, -39, 1900, 0.046), (2.948, -34, 1980, 0.036), (3.464, -34.5, 870, 0.02),
                    (3.677, -46, 1510, .06), (5.576, -33, 1920, 0.032), (5.586, -25.5, 650, 0.037),
                    (5.625, -29, 870, 0.033), (5.808, -40, 557, 0.089), (6.24, -49, 1270, 0.13),
                    (6.295, -51, 1060, 0.18), (6.365, -49.5, 960, 0.088), (6.435, -52, 1710, .06),
                    (7.245, -54, 950, .1), (7.295, -66, 906, 0.056), (7.415, -51, 1050, .06),
                    (7.838, -41, 754, 0.08), (8.006, -42.5, 1980, 0.049)]
    out, t = np.zeros(N), splash_time()
    for s, db, hz, t60 in squelch_rows:
        pitch = np.full(len(t), hz)
        cloud = bubbles(pitch, rate=1000, spread=0.322, cycles=8.4, size_db=8.0, rise=0.28)
        slap_spectrum = [(hz / 4, -24), (hz / 1.2, -4), (hz, 0), (hz * 2, -8), (hz * 5, -26), (hz * 9, -50)]
        slap = noise(slap_spectrum, size=len(t))
        wet = coloured(cloud, WATER) + amp(-5) * slap
        add(out, s, amp(db) * peak(wet * burst(t, t60, attack=0.00024)))
    return out


def plops():
    """Single air pockets close: a decaying sine each, with smaller bubbles breaking off."""
    # plops: (time [s], level [dB], first pitch [Hz], t60 [s])
    plop_rows = [(0.047, -44.5, 1446, 0.059), (0.479, -49.5, 469, 0.24), (0.9, -30, 505, 0.023),
                 (0.93, -32.5, 505, 0.022), (1.006, -39.5, 608, 0.037), (1.157, -34.5, 710, 0.021),
                 (1.047, -44, 620, 0.045), (1.105, -57, 1527, 0.051), (1.432, -36.5, 640, 0.056),
                 (1.784, -36.5, 534, 0.026), (1.975, -30.5, 573, 0.02), (2.11, -42, 486, .05),
                 (2.449, -33.5, 542, 0.036), (2.521, -47, 810, .05), (2.272, -48, 425, 0.11),
                 (3.686, -41, 694, 0.097), (3.724, -45, 670, .08), (3.754, -45, 708, 0.082),
                 (3.779, -59, 636, 0.045), (5.464, -22, 500, 0.033), (5.5, -19.5, 307, 0.098),
                 (5.545, -22, 339.4, 0.14), (5.578, -27, 498, 0.062), (5.805, -44.5, 516, 0.059),
                 (6.96, -53, 1760, .08), (7.066, -43, 900, 0.066), (7.355, -43, 950, 0.051),
                 (7.685, -47.5, 967, 0.05), (7.972, -39, 337, 0.11), (8.013, -42, 325, 0.13)]
    splash_db = -21.5
    out, t = np.zeros(N), splash_time()
    for s, db, hz, t60 in plop_rows:
        # the pitch lifts a little as the pocket nears the surface
        pocket = np.sin(2 * np.pi * hz * t * (1 + 0.69 * t))
        pitch = np.full(len(t), hz)
        splash = bubbles(pitch, rate=770, spread=0.43, cycles=6.7, size_db=2.0, rise=0.26)
        add(out, s, amp(db) * (pocket + amp(splash_db) * splash) * burst(t, t60, attack=AIR_ATTACK_S))
    return out


def drips():
    """Drops and blobs of foam land with a noise tap, spatter into tiny bubbles and throw a mist."""
    # drips: (time [s], level [dB], spatter pitch [Hz])
    drip_rows = [(0.3222, -37.5, 6060), (1.3378, -43, 3960), (1.367, -43.5, 5640), (1.393, -39, 4850),
                 (1.628, -44, 7050), (1.6641, -37, 5040), (1.7568, -46, 4760), (2.6093, -40.5, 5070),
                 (2.983, -46, 2760), (3.014, -51, 4700), (3.038, -55, 6000), (3.076, -43, 6240),
                 (3.136, -41, 4297), (3.1549, -41, 5050), (3.1662, -35, 6170), (3.2181, -37.5, 5740),
                 (3.761, -52, 5300), (3.83, -45, 5200), (3.865, -45.5, 5230), (3.9226, -54, 5460),
                 (3.963, -49, 4800), (4.828, -61, 5190), (5.145, -49.5, 10100), (5.2885, -56, 3770),
                 (5.392, -58, 3900)]
    # a drop hits the foam: (frequency [Hz], level [dB])
    landing_spectrum = [(1500, -13.5), (2800, 1.5), (7000, 4), (8500, -17), (11000, 2.5), (13000, -13),
                        (15500, -8)]
    drip_t60_s, mist_db = 0.043, -25.5
    out, t = np.zeros(N), splash_time()
    for s, db, hz in drip_rows:
        pitch = np.full(len(t), hz)
        spatter = bubbles(pitch, rate=760, spread=0.19, cycles=24, size_db=3.5, rise=0.054)
        # the mist lies an octave higher
        mist = bubbles(2 * pitch, rate=5400, spread=0.12, cycles=8.7, size_db=6.0, rise=0.054)
        landing = noise(landing_spectrum, size=len(t)) * fade(t, 0.018)
        spray = (spatter + amp(mist_db) * mist) * burst(t, drip_t60_s, attack=0.0023)
        add(out, s, amp(db) * peak(spray + amp(-7.5) * landing))
    return out


def pan_wall(f):
    """Response of the wet, hand-held pan: band-pass resonances of alternating sign."""
    # pan wall: (resonance [Hz], width [Hz], level [dB])
    resonances = [(503, 84, 0), (860, 60, -2), (1046, 83, 1), (1585, 120, -12.5), (2066, 71, -8.5),
                  (3310, 160, -12.5), (4030, 300, -17), (4510, 240, -14.5), (5070, 330, -17.5),
                  (5520, 160, -22)]
    return sum((-1) ** k * amp(db) * 1j * f * width / (hz * hz - f * f + 1j * f * width)
               for k, (hz, width, db) in enumerate(resonances))


def scrubbing():
    """Tiny uneven slips of the sponge excite the resonances of the pan wall."""
    # rubs: (start [s], rise [s], t60 [s], level [dB])
    rubs = [(5.311, 0.013, 0.24, -60), (6.149, 0.2, 0.57, -64.5), (6.48, 0.017, 0.42, -62.5),
            (6.76, 0.092, 0.43, -64.5), (7.1, 0.047, 0.27, -60), (7.2, 0.1, 0.086, -55.5),
            (7.355, 0.014, 0.12, -61), (7.4, 0.044, 0.15, -60), (7.6, 0.06, 0.14, -64.5),
            (7.82, 0.031, 1, -60), (7.94, 0.063, 0.17, -58.5), (8.319, .006, .35, -74.5)]
    slips_per_s, slip_scatter_db = 1800, 1
    out = np.zeros(N)
    for s, rise, t60, db in rubs:
        effort = stroke(rise, t60)
        size = len(effort)
        signs = rng.choice([-1, 1], size)
        force = amp(slip_scatter_db * rng.standard_normal(size))
        slips = signs * force * (rng.random(size) < slips_per_s / SR)
        add(out, s, amp(db) * effort * cavities(filtered(slips, pan_wall), depth_db=6.5))
    return out


def scene():
    """The washing gets strong early reflections; bowl bumps, taps and clatter are drier."""
    washing = sloshing() + squeezed_foam() + draining() + squelches() + plops() + drips()
    water = kitchen(in_pan(washing) + scrubbing() + gulps(), early_db=-5.0, wet_db=-6.5)
    bumps = kitchen(bowl(), early_db=-24.0, wet_db=-10.0)
    clinks = kitchen(glass_taps() + pan_taps() + in_pan(finger_ticks()), early_db=-20, wet_db=-10.0)
    clatter = kitchen(basin(), early_db=-15.0, wet_db=-12.5)
    return (amp(-1.17) * (water + bumps + clinks + clatter) + background())[None]


def record(dry):
    """The microphone cuts the bass, peaks in the top treble and stops at its band limit."""
    # bass cut and port resonance: (frequency [Hz], gain [dB])
    mic_gain = [(25, -21), (50, -7.5), (80, 1), (13500, -0.5), (14400, -1), (15200, 5.5), (15800, 6)]
    top_hz = 15800
    passband = lambda hz: np.clip((top_hz - hz) / 300 + .5, 0, 1)
    return np.array([filtered(x, lambda hz: amp(along(mic_gain, hz)) * passband(hz)) for x in dry])


dry = scene()
out = record(dry)
file_out(out)
```